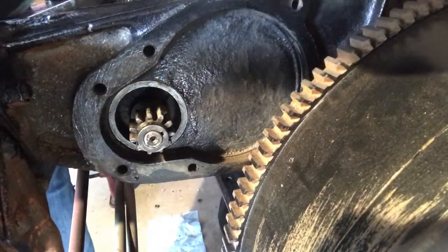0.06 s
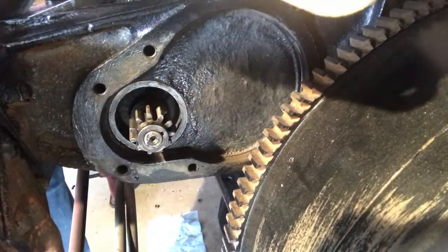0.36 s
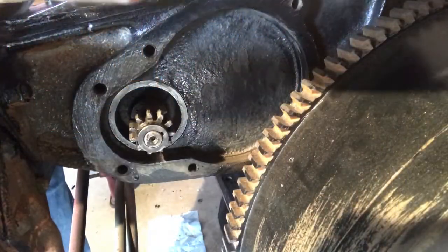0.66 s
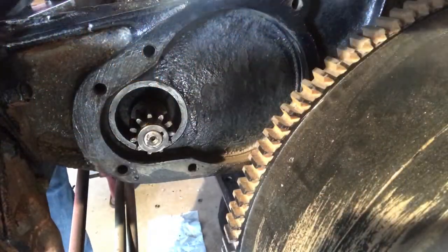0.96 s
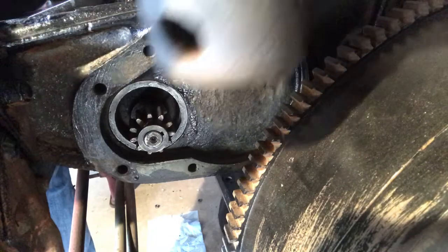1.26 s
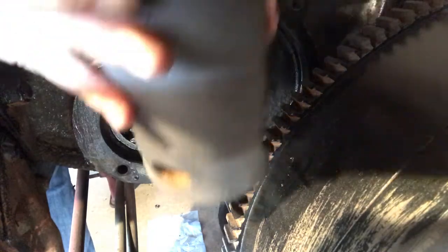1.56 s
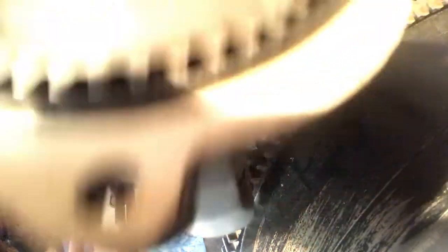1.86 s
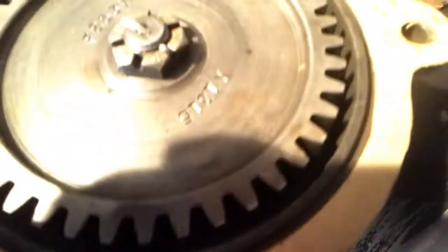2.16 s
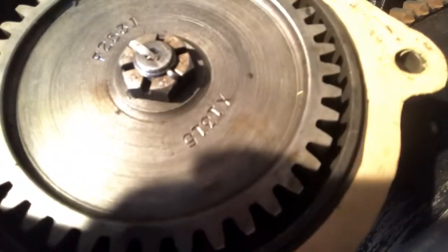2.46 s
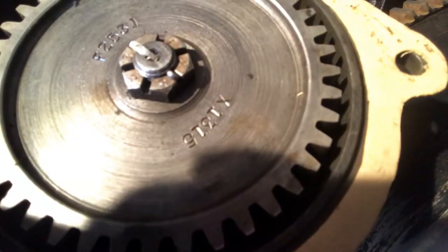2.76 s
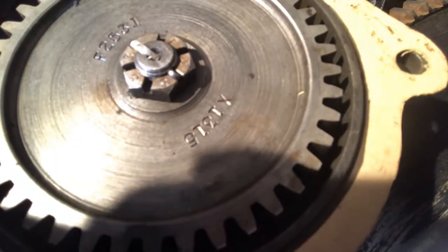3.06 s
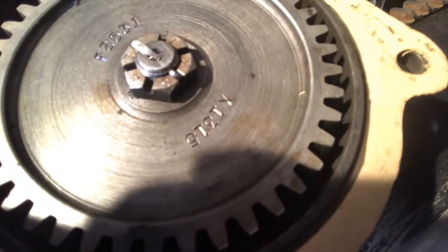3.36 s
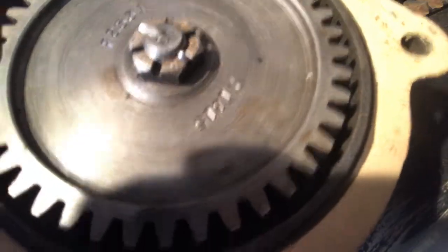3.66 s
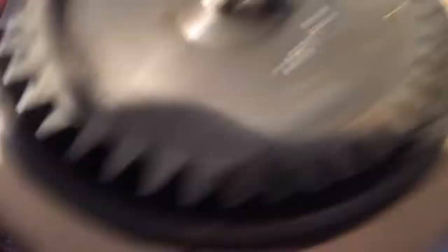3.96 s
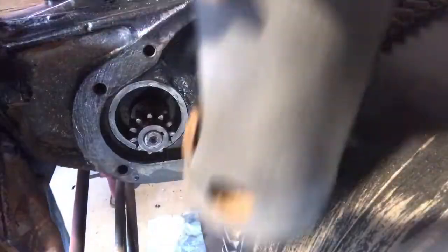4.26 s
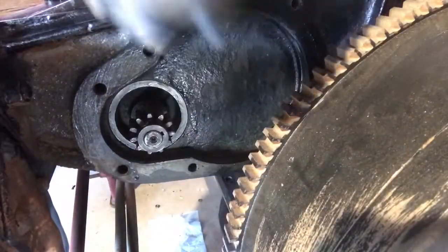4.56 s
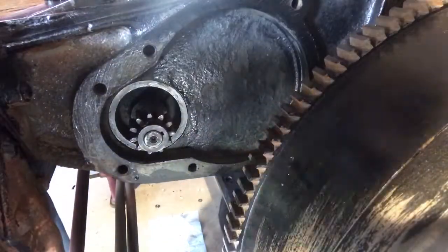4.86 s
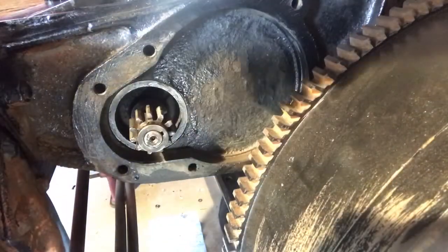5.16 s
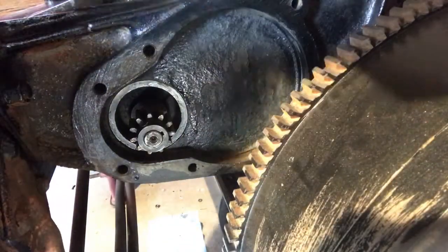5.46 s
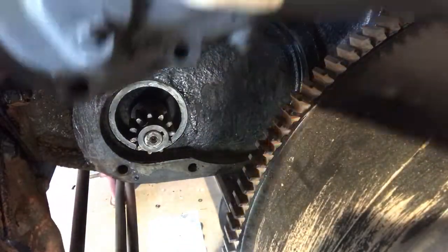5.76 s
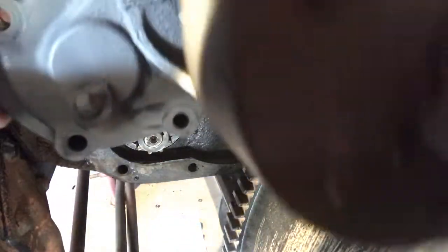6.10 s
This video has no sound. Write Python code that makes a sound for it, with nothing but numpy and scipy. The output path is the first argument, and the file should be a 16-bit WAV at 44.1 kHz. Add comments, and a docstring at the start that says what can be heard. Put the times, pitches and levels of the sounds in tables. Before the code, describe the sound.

A heavy metal part knocks against an engine casting, with loose gear clinks, light taps and faint scraping in a quiet workshop.

```python
"""Iron knocks, loose clinks and faint rubbing, close up in a quiet workshop with a mains hum.
A heavy starter motor is lifted to an engine's flywheel housing, turned in the hand and offered up again.
Its nose strikes the housing edge first, then flat, ringing both castings and the flywheel.
Its gear clinks across its play; in between, skin and iron slide in tiny slips."""
import sys
import numpy as np
from scipy import signal
from scipy.fft import rfft, irfft
from scipy.io import wavfile

SR = 44100
rng = np.random.default_rng(int(sys.argv[2]) if len(sys.argv) > 2 else 0)


def inscribe(sig):
    """Save sig as 16-bit PCM at rate SR to the path in sys.argv[1].

    A 1-D sig is mono; a 2-D sig holds one channel per row.
    Samples are clipped to [-1, 1] before scaling.
    """
    pcm = np.round(np.clip(np.atleast_2d(sig).T, -1, 1) * 32767)
    wavfile.write(sys.argv[1], SR, pcm.astype(np.int16))


N = 274743
T = np.arange(N) / SR
BANDS_HZ = 100 * 2 ** (np.arange(23) / 3)
BAND_FILTERS = [signal.butter(2, [hz / 2 ** (1 / 6), hz * 2 ** (1 / 6)], "band", fs=SR, output="sos")
                for hz in BANDS_HZ]

# Nose on housing. Each row: start in seconds, level in dB, contact corner, favoured pitch and snap centre
# in Hz, housing and nose ring in dB, share of ring time left by the grip, send to flywheel and room in dB,
# lag of the flat contact in seconds, its relative level in dB.
KNOCKS = [(0.246, -6.5, 10000, 1012, 3750, -8.5, -24, 1.2, -13, 0.0099, -12.5),
          (0.279, -22.5, 5760, 720, 3870, -16, -17, .8, -8, 0.013, -9),
          (3.96, -27.5, 3900, 950, 2600, -12, -15, 0.61, -15, 0.0077, -2),
          (4.065, -11, 2530, 1700, 7800, -6, -1.5, 0.69, -22, 0.0029, -8.5),
          (4.0775, -15.5, 7600, 2100, 7800, -7, -5, .6, -20.5, .0034, -11),
          (6.1018, -13, 3700, 1360, 5800, -4, -23, 0.77, -20.5, 0.0029, -14)]
# Gear in its play. Each row: catch time in seconds, level in dB, lead of the first touch in seconds,
# its relative level in dB, its corner in Hz, nose and gear ring in dB.
CLINKS = [(1.6288, -25.5, 0.013, 2.5, 1700, 4, -11), (1.671, -41.5, .007, 8, 1000, -6.5, -0.5),
          (1.7079, -35, 0.015, 2.5, 1000, 9.5, 0), (1.7371, -32.5, .006, -27, 1500, 9, 3.5),
          (1.839, -34, 0.011, -1.5, 1100, 10.5, 11.5), (1.881, -23.5, .009, -6, 1900, 6, 4.5),
          (1.918, -26, .014, 1.5, 1900, 7.5, 13), (2.091, -26.5, 0.013, -0.5, 1700, 1.5, 9.5),
          (2.122, -38, 0.0053, 2.5, 1500, 3.5, 4.5), (2.368, -31.5, 0.01, 4, 2200, 3, 13.5)]
# Modes of the nose, and the long note of free-hanging steel. Each row: pitch in Hz, level in dB, t60 in s.
NOSE_MODES = [(800, -6, 0.0063), (1368, -0.5, .055), (1340, -19.5, 0.023), (1990, -4.5, .04),
              (2260, -3.5, 0.016), (2870, -23.5, .045), (2880, -2, 0.056), (3020, -15, .03),
              (3486, -14.5, 0.091), (4170, -18, 0.021)]
STEEL_NOTE = [(1346, 0, 4.6)]


def undb(db):
    return 10 ** (np.asarray(db) / 20)


def unit(x):
    """Scale to the energy of 3 ms at rms 1."""
    return x * np.sqrt(.003 * SR / np.sum(x ** 2))


def add(track, start_s, x):
    i = max(int(start_s * SR), 0)
    track[i:i + len(x)] += x[:N - i]


def columns_at(table, hz):
    """Interpolate a table over log frequency."""
    table_hz, *columns = np.transpose(table)
    return [np.interp(np.log(hz), np.log(table_hz), column) for column in columns]


def fade(t60_s, size):
    return np.exp(-np.log(1000) * T[:size] / max(t60_s, 1e-3))


def hump_db(hz, centre_hz, octaves):
    """Bell over log frequency."""
    return 20 * np.log10(np.exp(-.5 * (np.log2(hz / centre_hz) / octaves) ** 2) + 1e-6)


def wander(steps, count=2000):
    """One random value per whole step, joined by lines."""
    return np.interp(steps, np.arange(count), rng.standard_normal(count))


def burst(band_db, band_t60_s, size=4500):
    """Dense modes: each third octave decays at its own rate."""
    noise = rng.standard_normal((len(BANDS_HZ), size))
    return sum(undb(db) * unit(signal.sosfilt(sos, row * fade(t60_s, size)))
               for sos, row, db, t60_s in zip(BAND_FILTERS, noise, band_db, band_t60_s))


def ring(modes, grip=1, size=7000, detune=0.0012):
    """Clear modes; the hand shortens them and shifts their pitch from blow to blow."""
    shifts = 1 + detune * rng.standard_normal(len(modes))
    return unit(sum(undb(db) * unit(np.sin(2 * np.pi * hz * shift * T[:size]) * fade(t60_s * grip, size))
                    for (hz, db, t60_s), shift in zip(modes, shifts)))


def contact(x, corner_hz):
    """A softer contact lasts longer and loses treble."""
    return signal.sosfilt(signal.butter(2, min(corner_hz, SR / 3), fs=SR, output="sos"), x)


def spread(x, rise_s):
    """Vibration takes a moment to fill the casting."""
    return x * (1 - np.exp(-T[:len(x)] / rise_s))


def thud(centre_hz, t60_s, size=4500):
    """The mass jolts against the hands: one heavily damped resonance."""
    hz = centre_hz * np.exp(0.13 * rng.standard_normal())
    jolt = np.sin(2 * np.pi * hz * T[:size]) * fade(t60_s, size)
    return unit(spread(jolt, rise_s=0.00085))


def tap(centre_hz, octaves, t60_s):
    """Dead contact: one band of short modes."""
    return unit(burst(hump_db(BANDS_HZ, centre_hz, octaves), np.full(len(BANDS_HZ), t60_s)))


def stroke(length_s, centre_hz, octaves, size=24000):
    """One slide: tiny slips under uneven pressure, coloured by local resonances."""
    slip_hz, pressure_hz, mode_spacing_hz = 350, 35, 170
    t = T[:size]
    hz = np.fft.rfftfreq(size, 1 / SR) + 1
    slips = undb(2.5 * wander(t * slip_hz) + wander(t * pressure_hz))
    colour = undb(hump_db(hz, centre_hz, octaves) + 3.5 * wander(hz / mode_spacing_hz)) / np.sqrt(hz)
    grain = irfft(rfft(slips * rng.standard_normal(size)) * colour, size)
    swell = np.sin(np.pi * np.minimum(t / length_s, 1))
    return swell * grain / grain.std()


def workshop(air_db=-58, hum_hz=120, hum_db=-65.5):
    """Low rumble, thin hiss and mains hum."""
    # Each row: frequency in Hz, relative noise density in dB.
    air_spectrum = [(15, -46), (25, -11.5), (59, -2.5), (80, -1), (92, -6.5), (123, -3.5), (190, -14),
                    (270, -13.5), (301, -18), (363, -12.5), (405, -17.5), (936, -22), (1840, -28.5),
                    (6380, -37.5), (16000, -52.5)]
    density_db, = columns_at(air_spectrum, np.fft.rfftfreq(N, 1 / SR) + 1)
    air = irfft(rfft(rng.standard_normal(N)) * undb(density_db), N)
    hum = np.sqrt(2) * np.sin(2 * np.pi * hum_hz * T)
    return undb(air_db) * air / air.std() + undb(hum_db) * hum


def room(x, build_s=0.005):
    """Diffuse echoes build up, then fade, treble first."""
    # Each row: frequency in Hz, relative density in dB, t60 in seconds.
    echo_bands = [(100, 1, 1), (308.7, -0.5, 1), (548, -4, .85), (1050, -5, 1), (1540, -5, 0.61),
                  (2268, -8.5, 0.16), (3000, -2.5, 0.2), (3980, -4.5, 0.35), (7900, -9.5, 0.17),
                  (14970, -21.5, .12)]
    db, t60_s = columns_at(echo_bands, BANDS_HZ)
    tail = burst(db + 10 * np.log10(BANDS_HZ), t60_s, size=SR) * (1 - np.exp(-T[:SR] / build_s))
    mid_gain = np.sqrt(np.mean(np.abs(rfft(tail)[700:1600]) ** 2))
    return signal.fftconvolve(x, tail / mid_gain)[:N]


def hands(jerk_db=3, jerk_hz=60):
    """Skin and sleeve hiss over the casting in small jerks."""
    # Each row: start and length in seconds, level in dB, centre in Hz.
    swishes = [(0.716, 0.082, -69, 5800), (.96, 0.46, -72, 5600), (1.383, 0.26, -67, 3800),
               (1.787, 0.066, -53.5, 4300), (4.502, 0.18, -67.5, 7500), (4.801, .07, -62.5, 6500),
               (4.909, 0.23, -67, 5840), (5.032, 0.55, -67.5, 5680), (5.376, .14, -82, 12000),
               (5.6, 0.25, -67, 3140)]
    out = np.zeros(N)
    for start_s, length_s, db, centre_hz in swishes:
        add(out, start_s, undb(db) * stroke(length_s, centre_hz, octaves=0.95))
    return out * undb(jerk_db * wander(T * jerk_hz))


def rubs(sing_db=-69):
    """Iron grates on iron; a light drag makes the steel note sing."""
    # Each row: start and length in seconds, level in dB, centre in Hz.
    slides = [(1.608, 0.19, -49, 700), (1.748, 0.19, -49.5, 440), (2.149, 0.16, -64, 1500),
              (3.598, .1, -60, 1140), (3.795, 0.16, -53, 460), (4.107, 0.18, -63.5, 1580),
              (4.465, .24, -67.5, 1500), (5.566, 0.18, -55.5, 1100), (5.678, .15, -52.5, 1170)]
    # Each row: start and length in seconds.
    light_drags = [(1.077, 0.078), (1.359, 0.22)]
    out = np.zeros(N)
    for start_s, length_s, db, centre_hz in slides:
        add(out, start_s, undb(db) * stroke(length_s, centre_hz, octaves=1.38))
    for start_s, length_s in light_drags:
        add(out, start_s, undb(sing_db) * stroke(length_s, STEEL_NOTE[0][0], octaves=0.033))
    return out


def taps():
    """Light damped contacts, and bumps as the weight shifts in the hands."""
    # Each row: start in seconds, level in dB, centre in Hz, width in octaves, t60 in seconds.
    touches = [(0.913, -35, 1730, 0.72, 0.031), (1.386, -58, 5870, 1.2, 0.044),
               (2.0625, -46, 2000, 0.45, 0.024), (2.348, -44.5, 750, 0.98, 0.02),
               (3.835, -43, 1450, 0.65, 0.04), (3.84, -55, 9200, 0.64, 0.0093),
               (3.855, -44.5, 1190, 0.43, 0.01), (3.913, -47, 1640, 1.07, 0.035),
               (4.141, -37, 1030, 0.91, 0.18), (4.203, -48.5, 2100, 0.68, 0.045),
               (4.455, -45, 3280, 1, 0.016), (4.493, -48, 1900, 0.39, 0.049),
               (4.8148, -45.5, 2000, 2.8, 0.053), (5.174, -45, 2300, 0.96, 0.16),
               (5.199, -45.5, 594, 1.6, 0.038), (5.321, -35, 1380, 0.81, 0.16),
               (5.3293, -43, 1314, 1.37, 0.041), (5.3397, -37, 359, 0.59, 0.062),
               (5.578, -50.5, 1103, 1.3, 0.083)]
    # Each row: start in seconds, level in dB, centre in Hz.
    bumps = [(0.661, -45.5, 200), (0.707, -39.5, 150), (1.906, -28, 75.4), (1.919, -33, 75),
             (3.833, -46, 90), (3.96, -43, 141)]
    out = np.zeros(N)
    for start_s, db, centre_hz, octaves, t60_s in touches:
        add(out, start_s, undb(db) * tap(centre_hz, octaves, t60_s))
    for start_s, db, centre_hz in bumps:
        add(out, start_s, undb(db) * thud(centre_hz, t60_s=0.022))
    return out


def nose_resonance(x, peak_db=-9, width_hz=70):
    """Handling noise picks up the nose's modes."""
    peaks = sum(signal.lfilter(*signal.iirpeak(hz, hz / width_hz, fs=SR), x) for hz, _, _ in NOSE_MODES)
    return x + undb(peak_db) * peaks


def hanging_steel(note_db, ping_db):
    """Free-hanging steel holds a long note and a thin ping."""
    # Each row: pitch in Hz, level in dB, t60 in seconds.
    ping_mode = [(6592, 0, 1.1)]
    note = ring(STEEL_NOTE, size=50000, detune=0)
    ping = ring(ping_mode, size=50000, detune=0)
    return undb(note_db) * note + undb(ping_db) * ping


def after_ring(flywheel_db=-3):
    """Knocks leave the flywheel humming; knocks and clinks ring the hanging steel."""
    # Each row: pitch in Hz, level in dB, t60 in seconds.
    flywheel_modes = [(450, -6, 0.4), (610, 4.5, .25), (905, -1, 0.41), (1036, -3, .35), (1230, -3.5, 0.27),
                      (1337.7, -4.5, .3), (1468.4, -13, 0.3), (1604, -13, 0.21), (1730, -4.5, .3),
                      (3930, -10.5, 0.13)]
    out = np.zeros(N)
    for start_s, db, *_, send_db, _, _ in KNOCKS:
        flywheel = ring(flywheel_modes, size=20000, detune=0.00052)
        add(out, start_s, undb(db + send_db + flywheel_db) * flywheel)
        add(out, start_s, hanging_steel(note_db=db - 40, ping_db=db + send_db - 33))
    for start_s, db, *_ in CLINKS:
        add(out, start_s, hanging_steel(note_db=db - 42, ping_db=db - 37))
    return out


def clinks(thud_db=-12.5, crack_send_db=-18, ring_send_db=-26):
    """The gear crosses its play: dull touch, skip, catch of the teeth. Returns direct and room send."""
    # Clear gear modes, dense steel modes. Each row: frequency in Hz, level in dB, t60 in seconds.
    gear_modes = [(671, -6.5, 0.039), (1454, -9, 0.036), (1706, 4.5, 0.032), (1860, -20, .035),
                  (2708, -7, 0.062)]
    steel_bands = [(148, -10, 0.17), (420, 0, 0.022), (640, 4, 0.0083), (934, 3, 0.084), (1580, 4.5, 0.012),
                   (2330, 4, 0.065), (3370, 2.5, 0.04), (6070, 2.5, 0.028), (8200, -3.5, 0.015),
                   (15200, 8, 0.021)]
    steel_db, steel_t60_s = columns_at(steel_bands, BANDS_HZ)
    direct, send = np.zeros(N), np.zeros(N)
    for catch_s, catch_db, lead_s, touch_db, touch_hz, tip_db, teeth_db in CLINKS:
        catch_hz = 5020 * 2 ** ((catch_db + 26.5) / 10)  # harder is brighter: an octave per 10 dB
        touch = catch_s - lead_s, catch_db + touch_db, touch_hz, -0.5, -17, -3.5
        skip = catch_s - 0.64 * lead_s, catch_db + touch_db - 7, 1480, -1.5, tip_db, teeth_db
        catch = catch_s, catch_db, catch_hz, -1.5, tip_db, teeth_db
        for start_s, db, corner_hz, crack_db, nose_db, gear_db in touch, skip, catch:
            crack = undb(crack_db) * unit(contact(burst(steel_db, steel_t60_s), corner_hz))
            jolt = undb(thud_db) * thud(centre_hz=76, t60_s=0.039)
            impact = spread(crack + jolt, rise_s=0.00023)
            modes = undb(nose_db) * ring(NOSE_MODES) + undb(gear_db) * ring(gear_modes)
            ringing = spread(contact(modes, corner_hz), rise_s=0.0015)
            for part, send_db in (impact, crack_send_db), (ringing, ring_send_db):
                add(direct, start_s, undb(db) * part)
                add(send, start_s, undb(db + send_db) * part)
    return direct, send


def knocks(focus_db=5, snap_db=-17.5, snap_lag_s=0.0011):
    """The nose lands edge first, then flat, ringing both castings. Returns direct and room send."""
    # Clear housing modes, dense iron modes. Each row: frequency in Hz, level in dB, t60 in seconds.
    housing_modes = [(655, -16.5, 0.16), (823, -18, .08), (1040, 10.5, 0.1), (1163, -19, .08),
                     (1460, -11, 0.057), (1560, -4.5, .03), (1850, -10.5, 0.053)]
    iron_bands = [(150, -27.5, .08), (393, -13, 0.036), (660, -5.5, 0.05), (1080, -1.5, 0.049),
                  (1720, 3, 0.03), (2100, -5.5, 0.051), (3200, -13.5, 0.09), (4242, -12, 0.066),
                  (5300, -28, 0.029), (8640, -19.5, 0.029), (15000, -15, .014)]
    iron_db, iron_t60_s = columns_at(iron_bands, BANDS_HZ)
    direct, send = np.zeros(N), np.zeros(N)
    for (edge_s, edge_db, corner_hz, place_hz, snap_hz,
         body_db, tip_db, grip, send_db, lag_s, flat_db) in KNOCKS:
        snap = contact(tap(snap_hz, octaves=0.42, t60_s=0.028), corner_hz)
        add(direct, edge_s + snap_lag_s, undb(edge_db + snap_db) * snap)
        edge = edge_s, edge_db, place_hz, body_db, tip_db
        # Flat contact is lower and rings the castings better.
        flat = edge_s + lag_s, edge_db + flat_db, 0.88 * place_hz, body_db + 13, tip_db + 12
        for start_s, db, pitch_hz, housing_db, nose_db in edge, flat:
            # Each spot favours its own modes.
            place_db = focus_db * undb(hump_db(BANDS_HZ, pitch_hz, octaves=0.56))
            iron = burst(iron_db + place_db, iron_t60_s * np.sqrt(grip))
            crack = undb(db) * unit(contact(iron, corner_hz))
            jolt = undb(-31 + 0.26 * db) * thud(centre_hz=200, t60_s=0.029)  # cushioned by the hands
            impact = spread(crack + jolt, rise_s=0.0026)
            modes = undb(housing_db) * ring(housing_modes, grip) + undb(nose_db) * ring(NOSE_MODES, grip)
            ringing = spread(undb(db) * contact(modes, corner_hz), rise_s=0.0035)
            for part, part_send_db in (impact, send_db), (ringing, send_db - 5):
                add(direct, start_s, part)
                add(send, start_s, undb(part_send_db) * part)
    return direct, send


def scene(handling_send_db=-11.5):
    """Blows and handling close by, the room behind."""
    blows, blows_send = knocks()
    gear, gear_send = clinks()
    handling = nose_resonance(taps() + rubs() + hands())
    echo = room(blows_send + gear_send + undb(handling_send_db) * handling)
    return (blows + gear + after_ring() + handling + echo + workshop())[None]


def record(dry, low_cut_hz=38, top_hz=15800):
    """Microphone bass cut and response dips, then a steep top cut."""
    # Each row: centre and width in Hz, depth from 0 to 1.
    mic_dips = [(3180, 1000, 0.3), (4890, 450, .6), (10400, 1200, 0.3)]
    x = signal.sosfilt(signal.butter(2, low_cut_hz, "high", fs=SR, output="sos"), dry)
    for hz, width_hz, depth in mic_dips:
        x = x - depth * signal.lfilter(*signal.iirpeak(hz, hz / width_hz, fs=SR), x)
    return signal.sosfilt(signal.ellip(10, .2, 70, top_hz, fs=SR, output="sos"), x)


dry = scene()
out = record(dry)
inscribe(out)
```